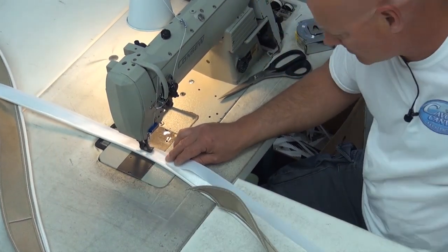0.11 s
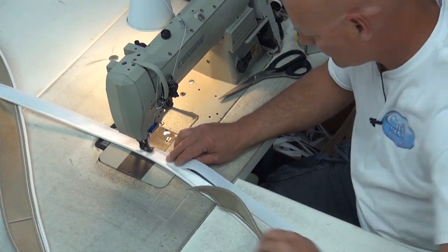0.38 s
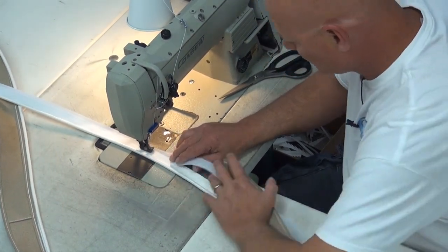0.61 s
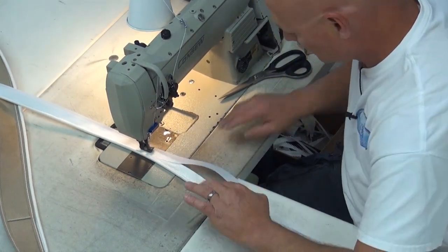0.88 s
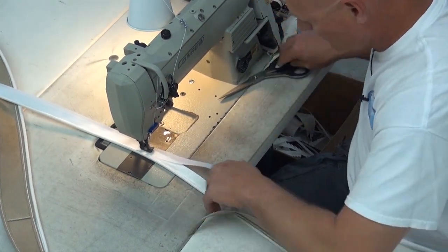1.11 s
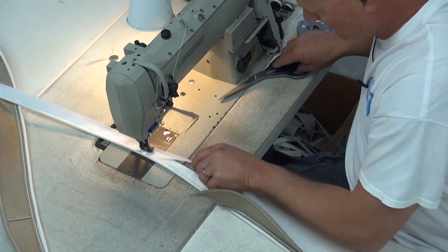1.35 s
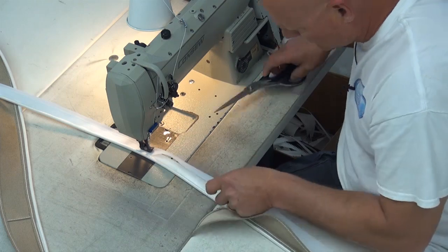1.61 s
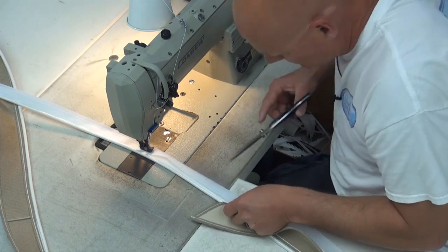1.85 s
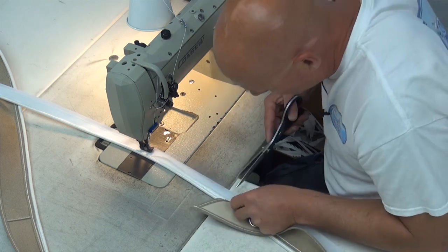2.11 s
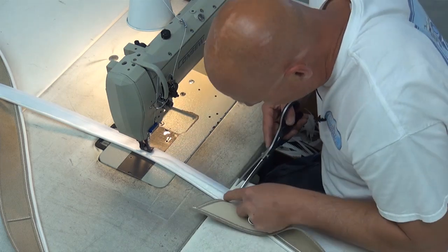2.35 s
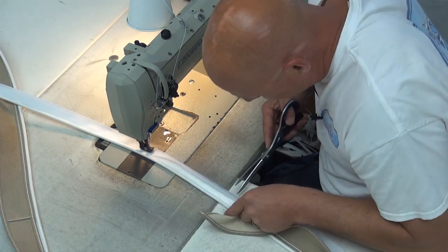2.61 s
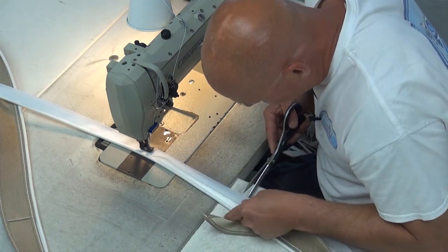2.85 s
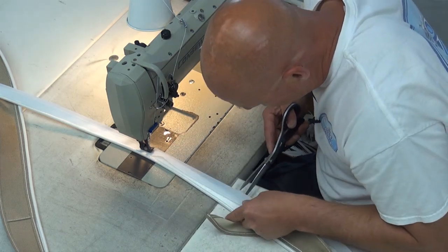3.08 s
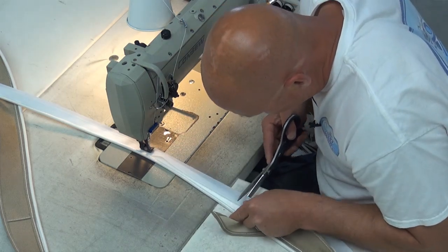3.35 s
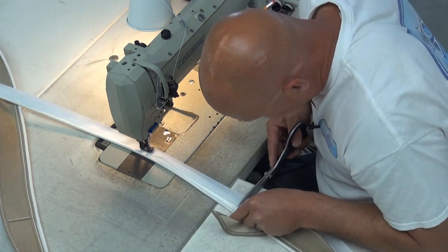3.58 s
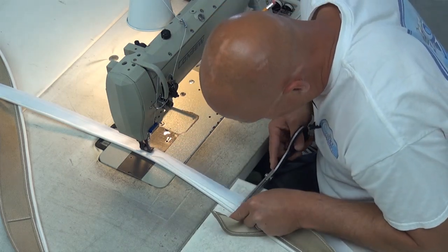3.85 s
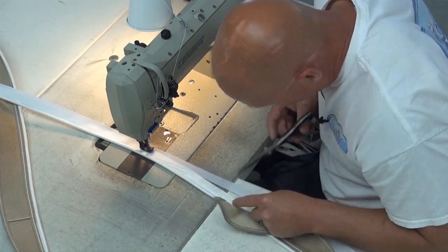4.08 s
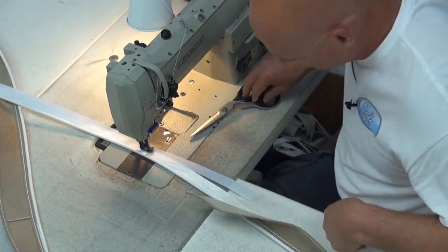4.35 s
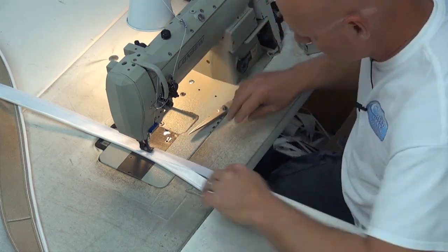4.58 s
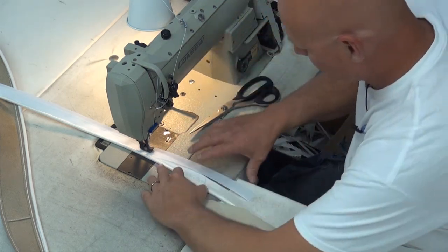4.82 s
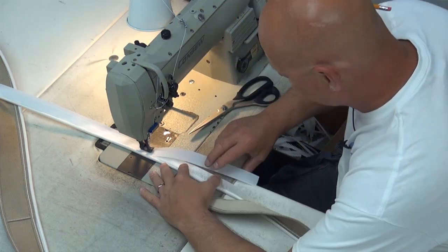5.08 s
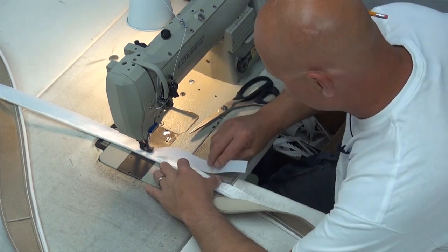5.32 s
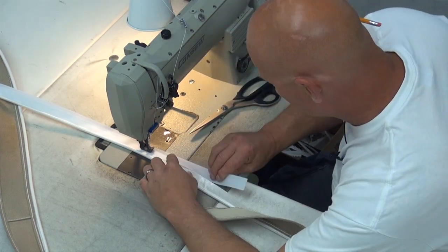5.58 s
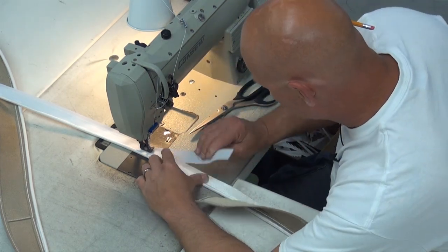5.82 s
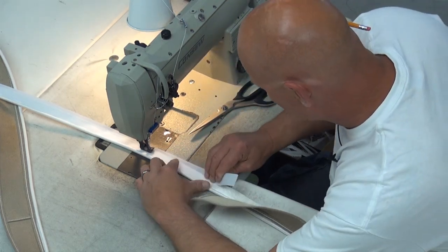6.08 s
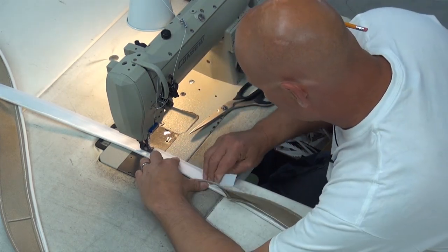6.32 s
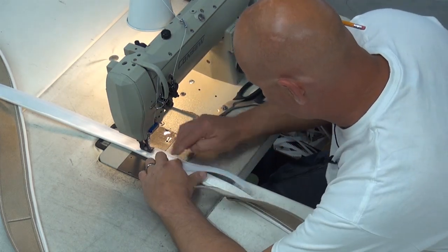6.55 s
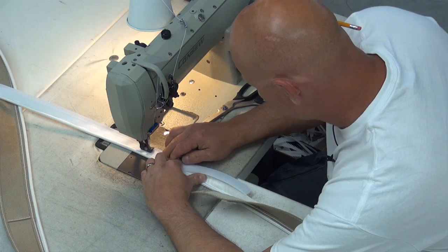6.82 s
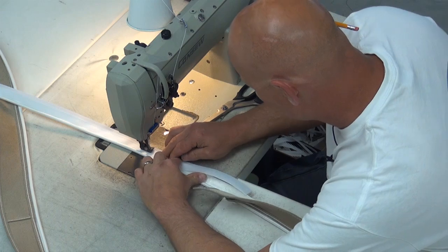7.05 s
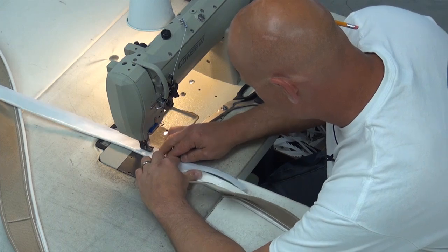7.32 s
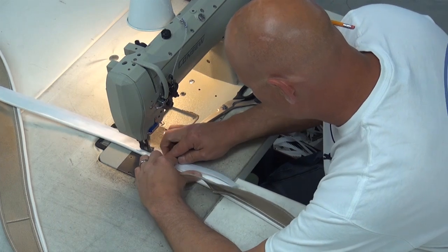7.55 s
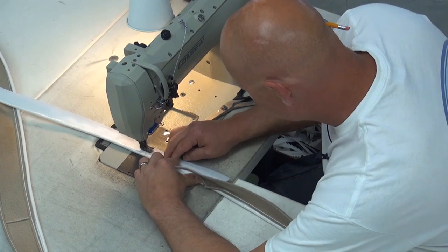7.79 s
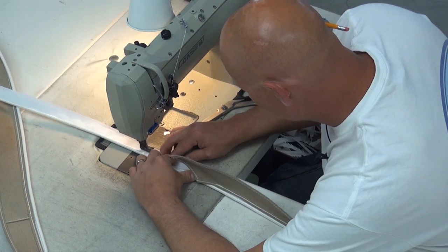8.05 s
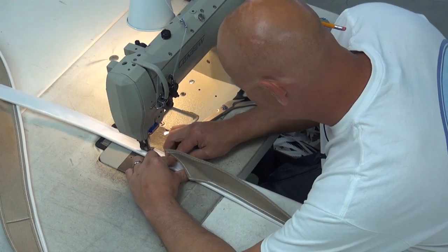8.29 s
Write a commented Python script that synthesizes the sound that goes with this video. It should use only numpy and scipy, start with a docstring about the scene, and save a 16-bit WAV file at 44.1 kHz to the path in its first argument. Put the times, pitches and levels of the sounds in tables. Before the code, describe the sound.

Workshop hum, crisp cloth handling, one sharp scissor cut and metallic drop, finger knocks and scraping, finally fast clattering machine stitching to the end.

```python
"""A sewing machine starts and stitches: six blows per shaft turn excite resonances of hook, gears, bed and table.
Before it, stiff fabric rustles and squeaks under the hands: flickering noise, grains and gliding sines.
Knocks and ticks are short noise bursts; scissors snip once and drop on the table, ringing as dying sines.
Behind lie a wavering mains hum and coloured room noise, all taken by one microphone."""
import sys
import numpy as np
from scipy import signal
from scipy.fft import rfft, irfft, next_fast_len
from scipy.io import wavfile
from scipy.ndimage import uniform_filter1d

SR = 44100
rng = np.random.default_rng(int(sys.argv[2]) if len(sys.argv) > 2 else 0)


def magnitude_from_level(level_db):
    """Linear magnitude for a level in decibels (20 dB per decade)."""
    exponent = np.asarray(level_db, float) / 20
    return 10 ** exponent


def inscribe(sig):
    """Save sig as 16-bit PCM at rate SR to the path in sys.argv[1].

    A 1-D sig is mono; a 2-D sig holds one channel per row.
    Samples are clipped to [-1, 1] before scaling.
    """
    pcm = np.round(np.clip(np.atleast_2d(sig).T, -1, 1) * 32767)
    wavfile.write(sys.argv[1], SR, pcm.astype(np.int16))


N = 371322

# Room noise spectrum: (frequency [Hz], relative density [dB])
ROOM_SPECTRUM = [(15, -13), (35, -6), (85, -5), (158, -14), (229, -11.5), (1100, -36.5), (3090, -36.5),
                 (15100, -41)]
ROOM_DB = -49.5  # rms
# Mains hum partials: (frequency [Hz], rms level [dB])
HUM_PARTIALS = [(59.8, -47), (121, -60), (239, -72), (302, -70.5)]

# Hands rubbing fabric: (peak time [s], rise [s], fall [s], sizzle level [dB], scrape level [dB])
RUBS = [(.01, .05, 0.35, -90, -44.5), (.135, 0.11, 0.45, -64, -39.5), (.491, .03, 0.08, -50.5, -59),
        (.614, 0.08, 0.2, -55, -50.5), (.771, 0.085, 0.2, -49, -44.5), (1.385, .03, 0.11, -51, -54.5),
        (1.466, 0.0036, 1, -41.5, -44), (1.7, 0.28, 0.28, -31.5, -44), (1.886, 0.2, 0.076, -31.5, -40),
        (1.958, 0.0091, 0.034, -30.5, -36), (2.262, 0.013, 0.012, -44, -50), (2.37, 0.12, 0.15, -35, -43),
        (2.562, 0.013, 0.075, -34.5, -45), (2.92, 0.2, 0.13, -32, -47), (2.983, 0.079, 0.026, -31.5, -45.5),
        (3.125, 0.031, 0.019, -40, -55), (3.357, 0.09, 0.24, -70, -46.5), (3.472, 0.058, 0.19, -50.5, -58),
        (3.618, 0.029, 0.014, -35, -72), (3.669, 0.018, 0.039, -37.5, -54), (4.04, 0.036, 0.43, -68, -44),
        (4.315, 0.63, 0.17, -53, -48.5), (4.407, 0.012, 0.02, -31, -35), (4.485, 0.023, 0.035, -22.5, -39),
        (4.49, 0.46, 0.21, -74, -44), (5.064, 0.072, 0.19, -39, -35), (5.498, 0.11, 0.085, -51, -48),
        (5.62, 0.063, 0.03, -42, -47.5), (5.759, 0.065, 0.03, -43, -49), (5.9, 0.22, 0.072, -50.5, -52),
        (5.979, 0.014, 0.029, -37.5, -49), (6.15, 0.1, 0.085, -42, -37), (6.344, 0.094, 0.021, -43, -41.5),
        (6.503, 0.087, 0.055, -29.5, -36), (6.563, 0.022, 0.022, -41, -34), (6.63, 0.14, 0.015, -58, -46.5),
        (6.755, 0.042, 0.069, -30, -39), (6.82, 0.14, 0.12, -47, -42.5)]
# Fabric and tools sliding on the table: (peak time [s], rise [s], fall [s], level [dB])
SLIDES = [(.12, 0.39, 0.58, -38), (.649, 0.14, 0.9, -43), (1.49, 0.1, 0.56, -44), (2.365, 0.39, 1, -50.5),
          (2.863, 1.5, 0.31, -53), (3.62, 0.88, 0.23, -52.5), (4.051, 0.071, 0.72, -44),
          (4.505, 0.12, 0.28, -30), (5.098, .7, 0.75, -47.5), (6.55, 2.15, 0.4, -52.5)]
# Scissors dragged over the table: (peak time [s], rise [s], fall [s], level [dB], band centre [Hz])
DRAGS = [(1.5, 0.032, .15, -45.5, 2860), (1.74, 0.11, 0.2, -47.5, 4450), (5.15, 0.24, 0.22, -54, 2270)]
# Brief squeaks: (start time [s], length [s], start frequency [Hz], end frequency [Hz], level [dB])
SQUEAKS = [(.97, 0.047, 1197, 1080, -43.5), (1.121, 0.017, 1400, 1290, -44),
           (1.397, 0.024, 1060, 1070, -44), (3.968, 0.015, 1095, 1030, -32), (4.131, 0.052, 853, 824, -36),
           (4.184, 0.081, 694, 566, -41)]
# Friction spectra of fabric, binding strip and sliding: (frequency [Hz], relative density [dB])
SIZZLE_SPECTRUM = [(3530, -92), (6300, -14), (8000, -4.5), (14200, 4.5), (16500, -7)]
SCRAPE_SPECTRUM = [(1500, -4.5), (2500, -2.5), (2950, -1), (3600, -1.5), (4450, -2), (5300, -5.5),
                   (6500, -4.5), (9000, -9)]
STRIP_SPECTRUM = [(1500, -4), (2500, -14.5), (3500, -7), (4300, 0), (5500, 2.5), (7000, 2), (9500, -6.5),
                  (12000, -7.5)]
SLIDE_SPECTRUM = [(80, -31), (140, -5.5), (420, 0.5), (700, -3.5), (1500, -6.5), (2200, -10.5), (4000, -25)]
# Faint level of the restless hands: (sizzle [dB], scrape [dB], strip [dB], slide [dB])
RESTLESS_DB = (-70, -70, -69.5, -70.5)
STRIP_S = 4.9  # from here on the fingers scrape the thin binding strip
EDGE_DB, BEND = 25.5, 1.346  # a stroke's loss one rise or fall away from its peak; exponent of the decline

# Knocks of fingers, scissors and pedal: (time [s], peak level [dB], knock frequency [Hz], snap over knock [dB])
SNAPS = [(0.611, -27, 230, -20), (0.659, -25.5, 203, -15), (0.769, -29, 1370, 2.5), (0.83, -30.5, 372, -5),
         (0.886, -25.5, 253, -7), (1.033, -29.5, 109, -30), (1.148, -33, 213, -6),
         (1.2173, -18.5, 390, -39), (1.392, -34, 550, -19), (1.574, -29, 345, -17), (1.618, -26, 328, -5),
         (1.909, -26, 467, 2.5), (2.329, -25, 2270, -12), (2.8, -29, 320, -20), (2.884, -40, 1500, -4),
         (3.03, -42, 1500, -18), (4.022, -31, 740, -12), (4.14, -30, 1190, -10), (4.181, -25, 1190, -12),
         (4.663, -19, 590, -22), (4.681, -18, 550, -9.5), (4.7339, -14, 580, -10), (4.767, -27, 700, -12),
         (4.816, -29, 520, -10), (4.8395, -11.5, 670, -19), (4.864, -23, 540, -18),
         (4.914, -21.5, 576, -16), (5.045, -23.5, 640, -9), (5.146, -30.5, 830, -6), (5.482, -34, 686, 0),
         (5.583, -33.5, 574, -0.5), (5.766, -24.5, 1224, 0), (6.166, -31.5, 550, 8), (6.347, -31, 730, -14),
         (7.227, -22, 198, -29), (7.2692, -15, 743, -1.5), (7.233, -28, 1190, -22), (7.3, -20, 2300, -7)]
# Crisp ticks of stiff fabric: (time [s], peak level [dB])
TICKS = [(1.955, -14), (2.2928, -17), (2.4, -19.5), (2.557, -26.5), (2.568, -30), (2.577, -27),
         (2.584, -31), (2.6529, -21.5), (2.7388, -27), (2.774, -31), (2.811, -30), (2.843, -23),
         (2.869, -25), (2.936, -18), (2.9775, -28), (3.1338, -25.5), (3.616, -29), (3.6547, -25),
         (3.676, -27), (3.715, -27), (5.973, -36), (6.009, -27), (6.4616, -12), (6.659, -24),
         (6.832, -17.5), (6.875, -29), (7.226, -21.5), (7.253, -30)]

# Blades shearing through the strip: (time [s], level [dB])
SHEAR = [(3.94, -44), (3.962, -60), (3.972, -28.5), (3.993, -25), (3.999, -36), (4.01, -54)]
# Scissors shutting, then landing: (time [s], crack peak [dB], blade ring peak [dB], wood ring peak [dB])
SCISSORS = [(3.9932, 0, -35, -33), (3.9969, -1, -36, -11.5), (4.3961, -4.5, -14, -18.5),
            (4.4463, -8, -17, -37), (4.4689, -7.5, -13, -12), (4.4845, -20, -15, -21),
            (4.4942, -6.5, -22, -7.5), (4.526, -19, -23, -17), (4.555, -37, -34, -18.5)]
# Modes of blades and table top: (frequency [Hz], relative level [dB], 60 dB decay time [s])
STEEL_MODES = [(1810, 5, 0.068), (2500, -0.5, 0.092), (4040, 2.5, 0.044), (5100, 6, 0.027),
               (6940, -15, 0.026)]
WOOD_MODES = [(321, 15.5, 0.15), (454, 12, 0.027), (580, 13, 0.047), (680, 16, 0.014), (920, 10, 0.01),
              (1000, 15.5, 0.037), (1410, 6, 0.014)]
# The shutting shakes the microphone: (time [s], peak level [dB], frequency [Hz], 60 dB decay time [s])
THUMP = (3.9985, -9, 100, 0.055)

# Shaft speed: (time [s], rate [stitches per s])
SPEED = [(7.2, 2.16), (7.3, 7.74), (7.4, 19.45), (7.55, 22.1), (7.7, 14.4), (7.85, 15.3), (8.0, 15.8),
         (8.2, 14.3), (8.42, 14.3)]
TURN_S = 7.3  # a turn begins here
# How hard the machine works: (time [s], effort re full load [dB])
EFFORT = [(7.191, -40), (7.251, -36), (7.297, -18), (7.316, -7), (7.351, -1.5), (7.431, 2.5), (7.548, 2.5),
          (7.9, 0.5), (8.42, 1.5)]
# Blows in one turn: (share of turn [1], hook and gears [dB], bed [dB], table [dB])
BLOWS = [(.17, -10, -5, -2), (.305, 0, -2, -3), (.53, -6, -7, -10), (.65, 0, -2, -4), (.77, 0, -4, -4),
         (.91, -7, 2, 2)]
# Resonances of the machine's parts: (frequency [Hz], width [Hz], relative level [dB])
HOOK_MODES = [(4200, 1360, -6), (5500, 660, 6), (5610, 140, -3), (6040, 340, 0.5)]
GEAR_MODES = [(8540, 200, 3.5), (11300, 7300, 0.9), (15700, 770, 1.4)]
BED_MODES = [(634, 71, 1.5), (727, 78, 6.5), (830, 440, -1.5), (1180, 54, 2), (1370, 68, 1),
             (2214, 114, -2.5), (2310, 380, -9)]
TABLE_MODES = [(24, 8.6, -9), (80, 27, -3), (120, 21, -2), (171.5, 40, -1.5), (219, 27, 1.5), (282, 49, 1),
               (345, 29, 3.5), (420, 56, -1.5)]
# Shaft harmonics that shake the table: (multiple of shaft rate [1], relative level [dB])
SHAKE = [(1, 4), (5, -3), (9, -3.5), (10, -5.5), (11, -1.5)]
# Hook, gears, bed, table: (level at full load [dB], effort followed [dB per dB], speed [dB per doubling])
PARTS = [(-21, 1, -2.5), (-28.5, 0.37, 6), (-22, 0.49, 1), (-22, 0.22, 0.5)]

# Upper band limit of the sound: (frequency [Hz], gain [dB])
BAND_LIMIT = [(15760, 0), (15920, -20), (16700, -37)]
# Faint residue in the side channel: (frequency [Hz], side re mid [dB])
SIDE_SPECTRUM = [(60, -41), (240, -57), (950, -42.5), (3770, -41), (15000, -37)]


def evened(x):
    """Mean-square normalization: scales to rms 1."""
    return x / np.sqrt(np.mean(x ** 2) + 1e-20)


def peaked(x):
    """Peak normalization: scales to peak 1."""
    return x / abs(x).max()


def coloured(x, points):
    """Spectral weighting: a gain curve joined in dB over log frequency."""
    size = next_fast_len(len(x))
    hz, db = np.transpose(points)
    bin_hz = np.fft.rfftfreq(size, 1 / SR)
    gain = magnitude_from_level(np.interp(np.log(bin_hz + 1), np.log(hz + 1), db))
    return irfft(rfft(x, size) * gain, size)[:len(x)]


def resonate(x, hz, width_hz):
    """Simple resonance: a two-pole band-pass of gain 1 at its centre."""
    return signal.lfilter(*signal.iirpeak(hz, hz / width_hz, SR), x)


def ring(modes, detune):
    """Modal decay: a struck body sounds as dying sines, varied in level and pitch at each blow."""
    t = np.arange(SR // 4) / SR
    out = np.zeros(len(t))
    for hz, db, t60 in modes:
        decay = magnitude_from_level(db + 2.6 * rng.standard_normal() - 60 * t / t60)
        blow_hz = hz * (1 + detune * rng.standard_normal())
        out += decay * np.sin(2 * np.pi * blow_hz * t)
    return out


def burst(t60):
    """Exponential decay: a puff of noise that falls 60 dB in t60 seconds."""
    t = np.arange(SR // 8) / SR
    return rng.standard_normal(len(t)) * magnitude_from_level(-60 * t / max(t60, 1e-3))


def grains(size, per_s, spread_db):
    """Shot noise: sparse clicks of random sign, a few of them large."""
    sizes = magnitude_from_level(spread_db * np.minimum(rng.exponential(1, size), 4)) * rng.standard_normal(size)
    return evened(sizes * (rng.random(size) < per_s / SR))


def add(mix, s, sound):
    """Superposition: adds a sound to the mix at time s."""
    part = mix[round(s * SR):][:len(sound)]
    part += sound[:len(part)]


def workshop(waver_db=.7):
    """Stationary background: broadband room noise and hum partials that waver in level and phase."""
    t = np.arange(N) / SR
    drift = rng.standard_normal((len(HUM_PARTIALS), N))
    waver = evened(uniform_filter1d(uniform_filter1d(drift, 2000), 2000))
    hum = np.zeros(N)
    for (hz, db), w in zip(HUM_PARTIALS, waver):
        hum += np.sqrt(2) * magnitude_from_level(db + waver_db * w) * np.sin(2 * np.pi * hz * t + 0.32 * w)
    air = coloured(rng.standard_normal(N), ROOM_SPECTRUM)
    return hum + magnitude_from_level(ROOM_DB) * evened(air)


def walls(x, t60=0.21, dull_hz=2500):
    """Diffuse reverberation: convolution with a dull decaying noise tail from 8 ms on."""
    t = np.arange(SR // 2) / SR
    tail = rng.standard_normal(len(t)) * magnitude_from_level(-60 * t / t60) * (t > .008)
    tail = signal.lfilter(*signal.butter(1, dull_hz, fs=SR), tail)
    return signal.oaconvolve(x, tail / np.linalg.norm(tail))[:N]


def strokes(rows, rest_db):
    """Addition of powers: strokes swell and fade over a rest level that ends as the machine begins."""
    t = np.arange(0, N + 64, 64) / SR
    power = magnitude_from_level(rest_db) ** 2 * (t < SPEED[0][0])
    for peak, rise, fall, db in rows:
        away = np.where(t < peak, (peak - t) / rise, (t - peak) / fall)
        power = power + magnitude_from_level(db - EDGE_DB * np.minimum(away, 10) ** BEND) ** 2
    return np.interp(np.arange(N) / SR, t, np.sqrt(power))


def patchy(x, db):
    """Time-varying filtering: the colour drifts in bands, as the rubbed spot changes."""
    z = signal.stft(x, nperseg=256)[2]
    field = uniform_filter1d(rng.standard_normal(z.shape), size=5, axis=0)  # across frequency
    field = uniform_filter1d(field, size=24, axis=1)  # across time
    return signal.istft(z * magnitude_from_level(db * evened(field)), nperseg=256)[1][:len(x)]


def drags(slips, width_hz=600):
    """Resonant friction: scissors dragged over the table sing in a narrow band."""
    out = np.zeros(N)
    for *stroke, hz in DRAGS:
        friction = slips + rng.standard_normal(N)
        song = resonate(resonate(friction, hz, width_hz), hz, width_hz)
        out += strokes([stroke], -120) * evened(song)
    return out


def squeaks(rough=0.42):
    """Frequency glide: brief sines slide in pitch under a roughened arch."""
    out = np.zeros(N)
    for start, length, hz, end_hz, db in SQUEAKS:
        arch = np.hanning(round(length * SR))
        arch *= 1 + rough * evened(uniform_filter1d(rng.standard_normal(len(arch)), size=50))
        phase = 2 * np.pi * np.cumsum(np.linspace(hz, end_hz, len(arch))) / SR
        add(out, start, magnitude_from_level(db) * arch * np.sin(phase))
    return out


def fabric():
    """Slip friction: fibres slip in clumps, so hiss and grains share one flicker across the registers."""
    rubs = np.array(RUBS)
    sizzles = rubs[:, :-1]
    scrapes = np.delete(rubs, -2, axis=1)
    cloth = scrapes[scrapes[:, 0] < STRIP_S]
    strip = scrapes[scrapes[:, 0] > STRIP_S]
    clumps = uniform_filter1d(rng.standard_normal(N), size=220)
    clumps = evened(uniform_filter1d(clumps, size=60))
    slips = grains(N, per_s=2500, spread_db=2.4)
    # strokes, spectrum, flicker [dB], grains over hiss [1], drift of colour [dB]
    registers = ((sizzles, SIZZLE_SPECTRUM, 2.6, .8, 2.5),
                 (cloth, SCRAPE_SPECTRUM, 2.2, .4, 2.5),
                 (strip, STRIP_SPECTRUM, 2.4, .5, 2.5),
                 (SLIDES, SLIDE_SPECTRUM, 2.6, .4, 1.2))
    out = drags(slips) + squeaks()
    for (rows, spectrum, flicker_db, share, drift_db), rest_db in zip(registers, RESTLESS_DB):
        rub = coloured(rng.standard_normal(N) + share * slips, spectrum)
        rub *= magnitude_from_level(flicker_db * clumps)
        out += strokes(rows, rest_db) * evened(patchy(rub, drift_db))
    return out


def snaps(sharpness=2.24, knock_t60=0.07, edge=5):
    """Impulse excitation: dull resonant knocks led by one edge, with a bright snap on top."""
    out = np.zeros(N)
    snappy = signal.butter(1, (1800, 7000), "band", fs=SR)
    for s, db, hz, snap_db in SNAPS:
        dull, bright = burst(knock_t60), burst(.012)
        dull[:round(SR / hz / 8)] -= edge  # an eighth of a period long
        knock = peaked(resonate(uniform_filter1d(dull, size=5), hz, hz / sharpness))
        snap = peaked(signal.lfilter(*snappy, bright))
        add(out, s, magnitude_from_level(db) * (knock + magnitude_from_level(snap_db) * snap))
    return out


def ticks():
    """High-pass transient: stiff fabric ticks as a click with a short noise decay."""
    out = np.zeros(N)
    crisp = signal.butter(1, 4500, "high", fs=SR)
    for s, db in TICKS:
        tick = burst(.01)
        tick[0] = 2
        add(out, s, magnitude_from_level(db) * peaked(signal.lfilter(*crisp, tick)))
    return out


def scissors(crack_t60=0.021):
    """Fracture and impact: shearing fibres hiss, then cracks ring the blades and the table top."""
    t = np.arange(N) / SR
    fibres = grains(N, per_s=12000, spread_db=2)
    hiss = evened(coloured(fibres, [(60, -20), (300, 6.0), (1800, 10.0), (16000, 6.5)]))
    out = magnitude_from_level(np.interp(t, *np.transpose(SHEAR), left=-120, right=-120)) * hiss
    for s, db, steel_db, wood_db in SCISSORS:
        crack = coloured(burst(crack_t60), [(60, -45), (500, -3.5), (2000, -5), (6000, -6.5), (16000, -14.0)])
        contact = burst(0.068 * crack_t60)[:SR // 50]  # brief and uneven
        steel = signal.fftconvolve(ring(STEEL_MODES, detune=0.0069), contact)
        wood = signal.fftconvolve(ring(WOOD_MODES, detune=0.035), burst(0.016))
        add(out, s, magnitude_from_level(db) * peaked(crack))
        add(out, s, magnitude_from_level(steel_db) * peaked(steel))
        add(out, s, magnitude_from_level(wood_db) * peaked(wood))
    s, db, hz, t60 = THUMP
    add(out, s, magnitude_from_level(db) * peaked(ring([(hz, 0, t60)], detune=0)))
    return out


def blows(turns, k, scatter_db=2):
    """Periodic impact: one impulse per blow and turn on part k, scattered in level."""
    knocks = np.zeros(len(turns))
    for share, hook_db, bed_db, table_db in BLOWS:
        at = np.flatnonzero(np.diff(np.floor(turns - share)))
        db = (hook_db, hook_db, bed_db, table_db)[k]
        knocks[at] = magnitude_from_level(db + scatter_db * rng.standard_normal(len(at)))
    return knocks


def machine():
    """Forced resonance: each blow knocks and sets loose parts rattling; hook, gears, bed and table ring."""
    t = np.arange(round(SPEED[0][0] * SR), N) / SR
    speed = np.interp(t, *np.transpose(SPEED))
    turns = np.cumsum(speed) / SR
    turns -= np.interp(TURN_S, t, turns)
    effort_db = np.interp(t, *np.transpose(EFFORT))
    # modes, time to the rattle's peak [s], steady chatter [1], clean knock [1], broad skirt [1]
    bodies = ((HOOK_MODES, .002, .15, .3, .04),
              (GEAR_MODES, .0024, .65, .08, .05),
              (BED_MODES, .0035, .45, .6, .15),
              (TABLE_MODES, .007, .35, .75, .1))
    out = np.zeros(N)
    for k, (modes, rattle_s, chatter, clean, skirt) in enumerate(bodies):
        knocks = blows(turns, k)
        # rattling swells and dies after the knock, over a steady chatter
        lag = np.arange(SR // 20) / SR / rattle_s
        shaking = chatter + signal.oaconvolve(knocks, np.e * lag * np.exp(-lag))[:len(t)]
        loose = grains(len(t), per_s=14000, spread_db=1.8)
        drive = evened(shaking * loose) + clean * evened(knocks)
        if modes is TABLE_MODES:
            drive += .16 * sum(magnitude_from_level(db) * np.cos(2 * np.pi * m * turns + m * m) for m, db in SHAKE)
        part = np.zeros(len(t))
        for i, (hz, width_hz, db) in enumerate(modes):
            part += (-1) ** i * magnitude_from_level(db) * resonate(drive, hz, width_hz)  # neighbours in opposite sign
        skirt_hz = modes[2][0]
        part = evened(part) + skirt * evened(resonate(drive, skirt_hz, skirt_hz))
        full_db, effort_share, doubling_db = PARTS[k]
        level_db = full_db + effort_share * effort_db + doubling_db * np.log2(speed / speed[-1])
        out[-len(t):] += magnitude_from_level(level_db) * evened(part)
    return out


def scene():
    """Linear superposition: all sources near one microphone; only knocks, ticks and scissors reverberate."""
    hits = snaps() + ticks() + scissors()
    mix = workshop() + fabric() + hits + magnitude_from_level(-22.0) * walls(hits) + machine()
    return np.array([mix, mix])


def band_limit(x):
    """A steep low-pass at the top of the band."""
    return signal.sosfilt(signal.butter(12, 16700, fs=SR, output="sos"), x)


def record(dry, side_noise_db=-72):
    """Near-perfect correlation: nearly mono, with a faint residue in the side channel; peaks clip."""
    smear = burst(0.005)[:512]
    smeared = signal.oaconvolve(dry[0], smear / np.linalg.norm(smear))[:N]
    side = coloured(smeared, SIDE_SPECTRUM)
    # faint mid-range noise of opposite sign in the two channels
    side_noise = coloured(rng.standard_normal(N), [(40, -42), (400, 8.5), (2000, 2.5)])
    side += magnitude_from_level(side_noise_db) * evened(side_noise)
    channels = [coloured(x, BAND_LIMIT) for x in dry + [side, -side]]
    return band_limit(np.clip(channels, -1, 1))


dry = scene()
out = record(dry)
inscribe(out)
```